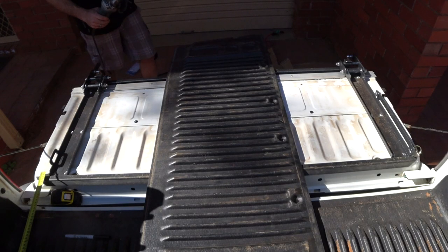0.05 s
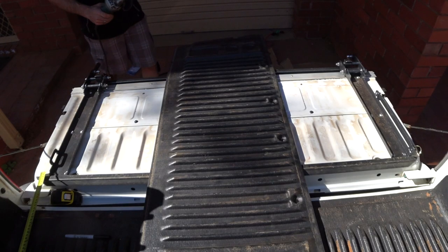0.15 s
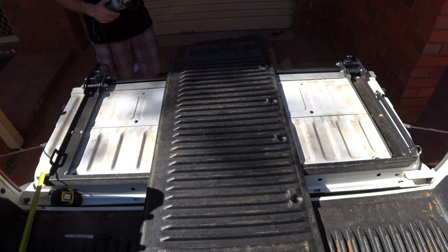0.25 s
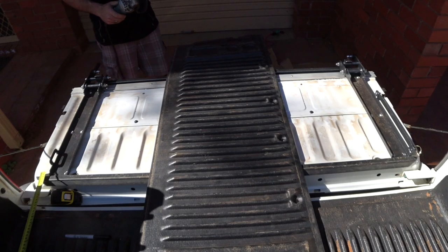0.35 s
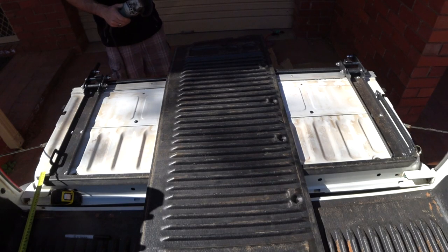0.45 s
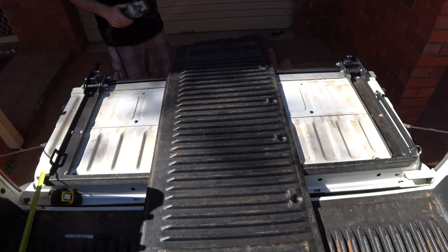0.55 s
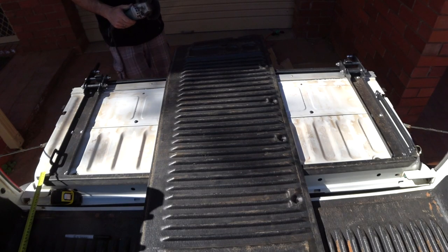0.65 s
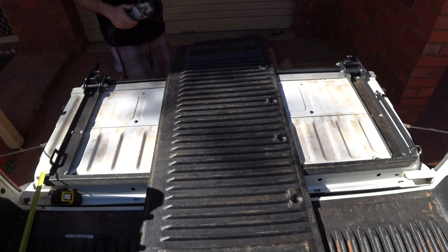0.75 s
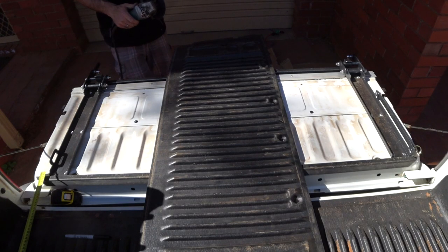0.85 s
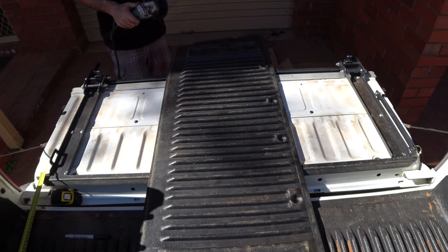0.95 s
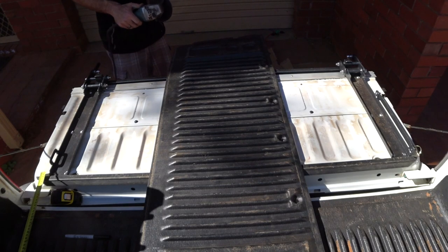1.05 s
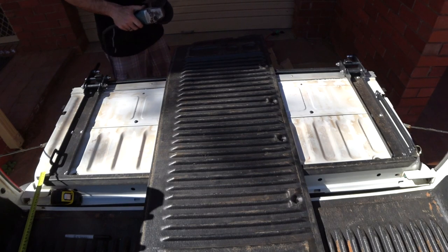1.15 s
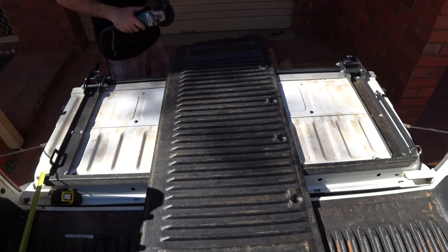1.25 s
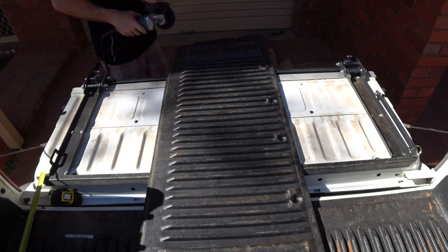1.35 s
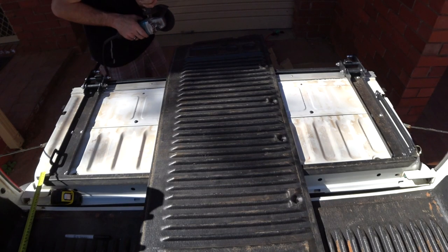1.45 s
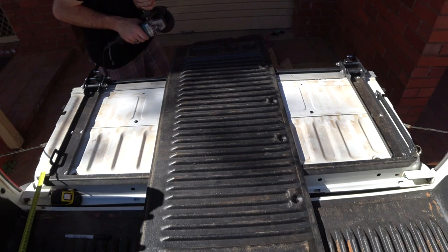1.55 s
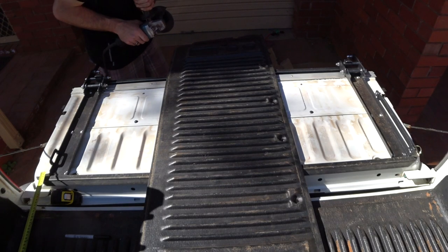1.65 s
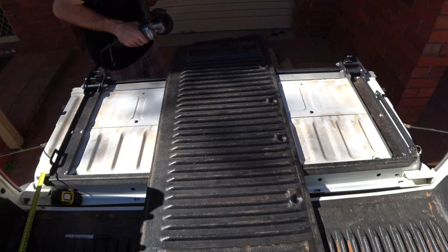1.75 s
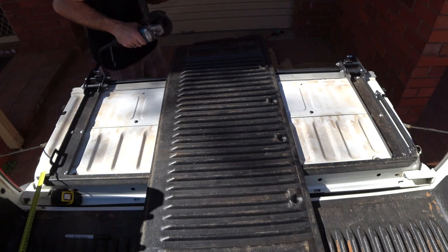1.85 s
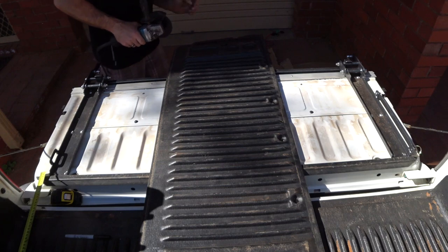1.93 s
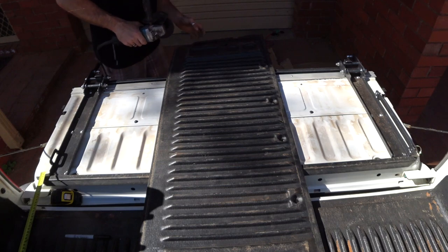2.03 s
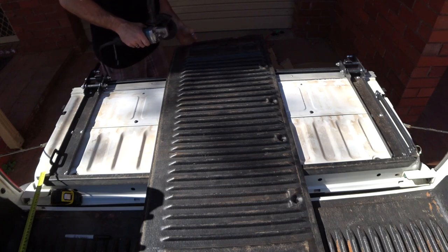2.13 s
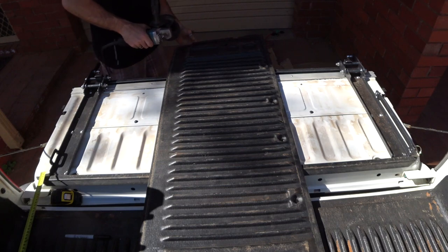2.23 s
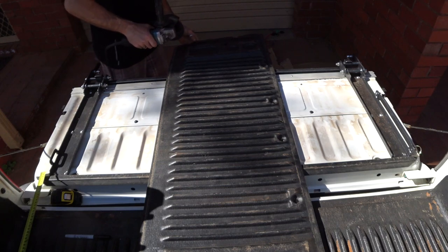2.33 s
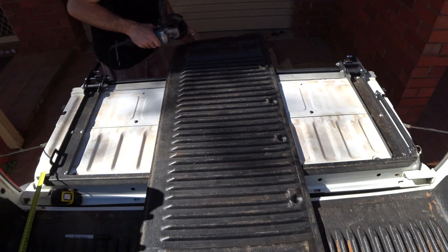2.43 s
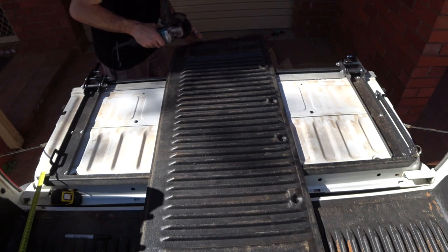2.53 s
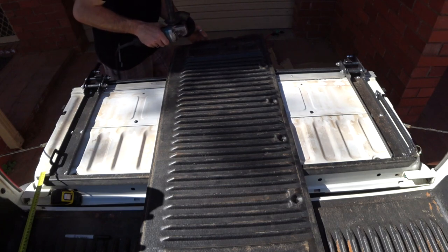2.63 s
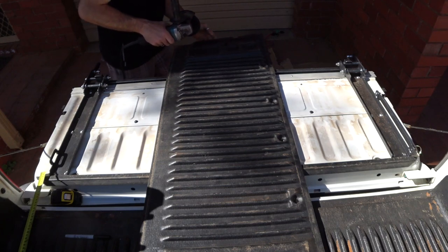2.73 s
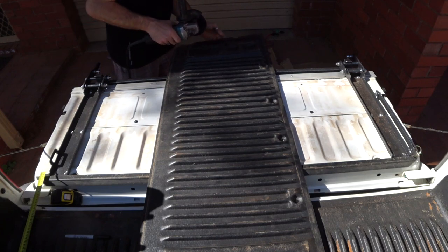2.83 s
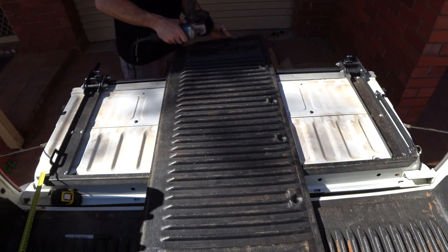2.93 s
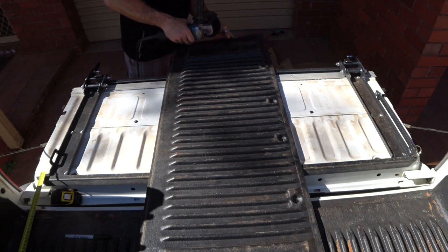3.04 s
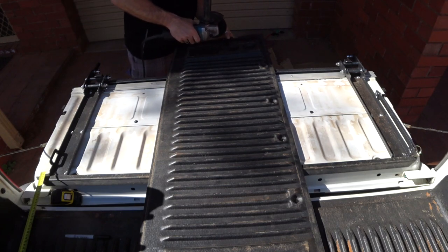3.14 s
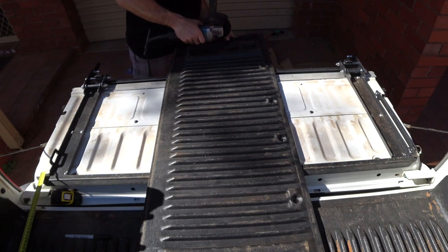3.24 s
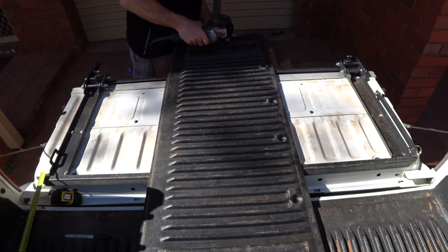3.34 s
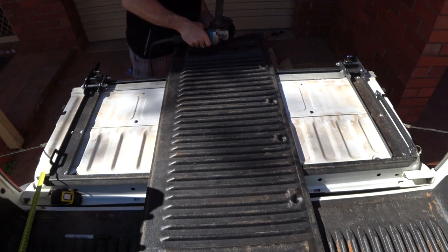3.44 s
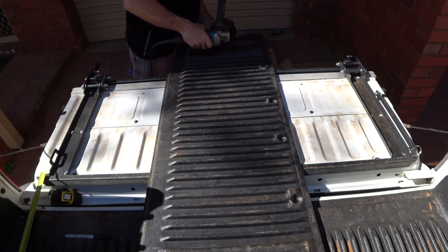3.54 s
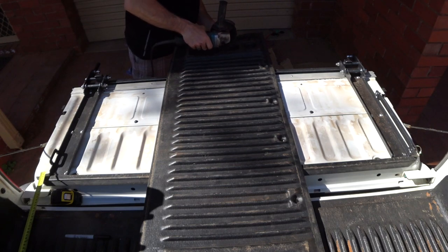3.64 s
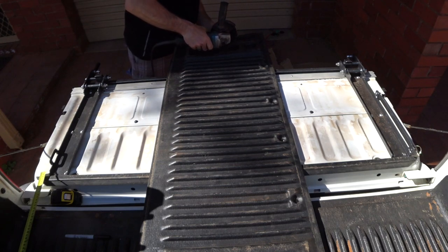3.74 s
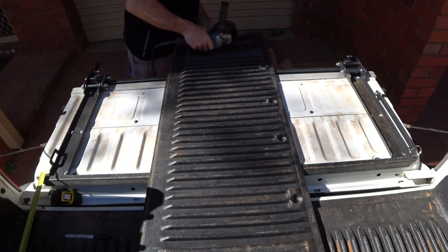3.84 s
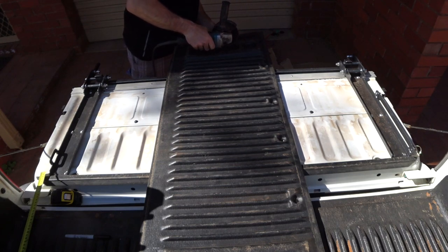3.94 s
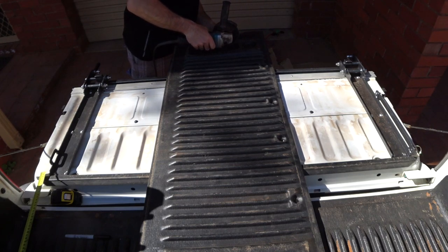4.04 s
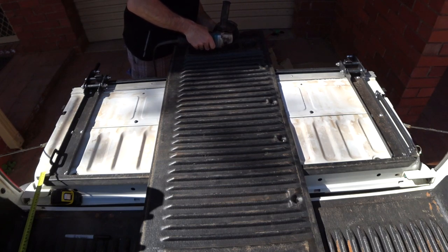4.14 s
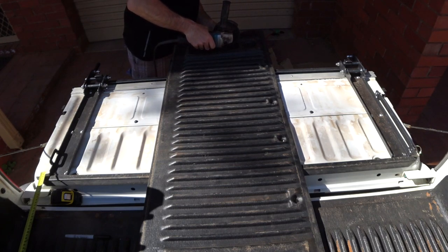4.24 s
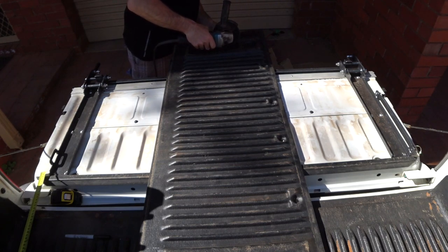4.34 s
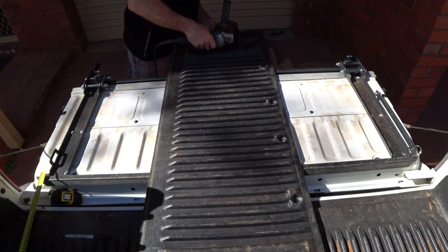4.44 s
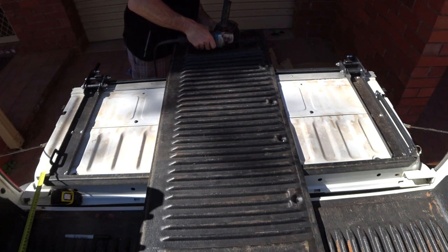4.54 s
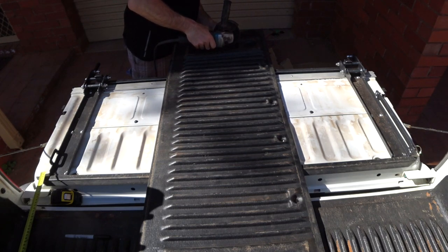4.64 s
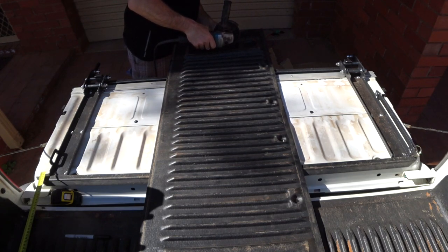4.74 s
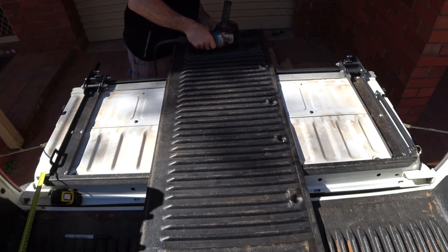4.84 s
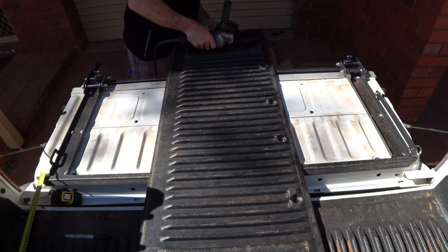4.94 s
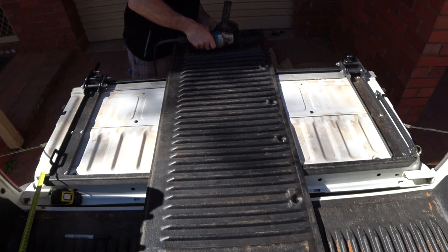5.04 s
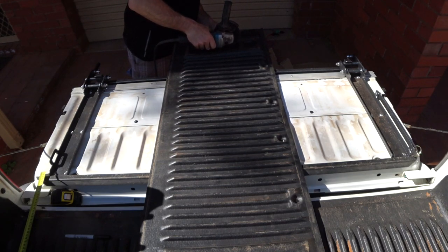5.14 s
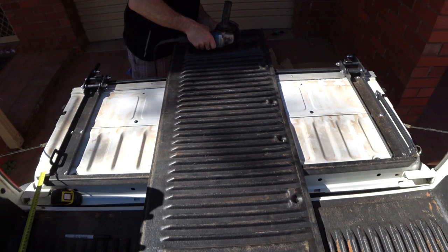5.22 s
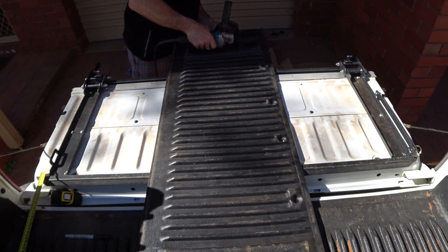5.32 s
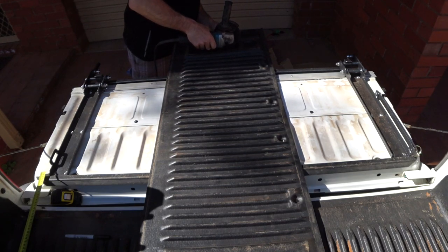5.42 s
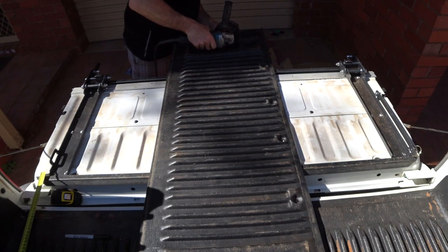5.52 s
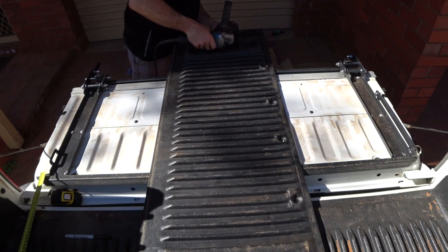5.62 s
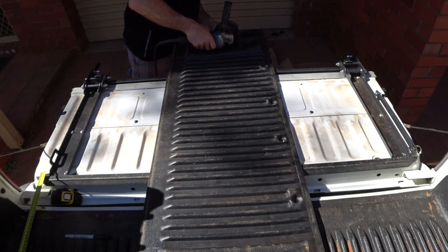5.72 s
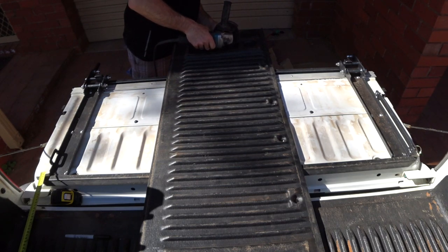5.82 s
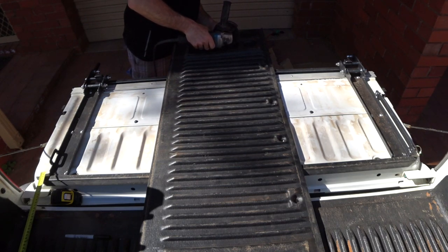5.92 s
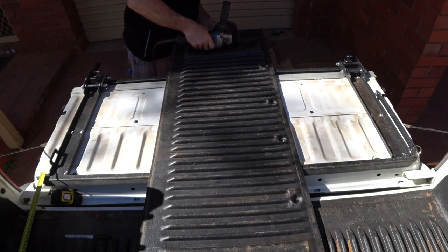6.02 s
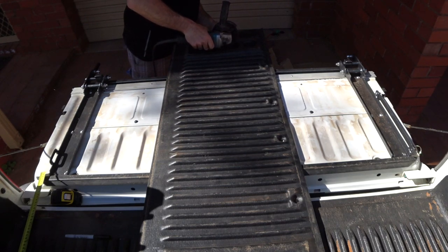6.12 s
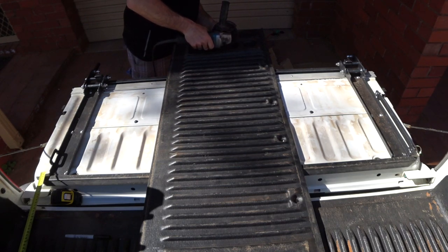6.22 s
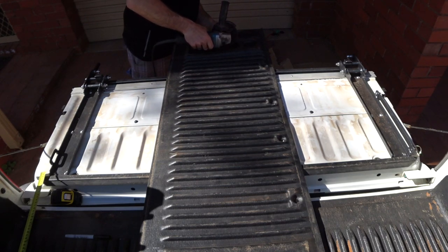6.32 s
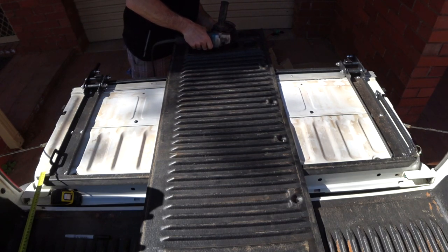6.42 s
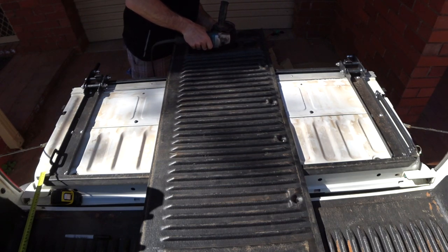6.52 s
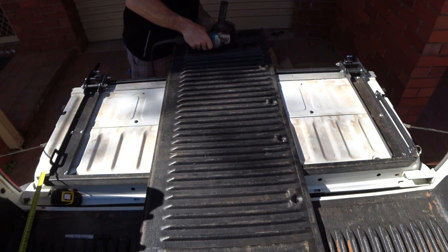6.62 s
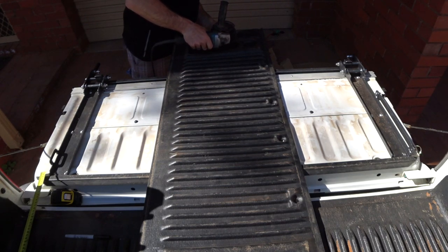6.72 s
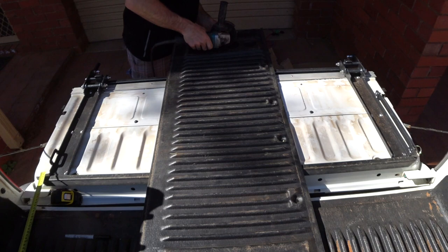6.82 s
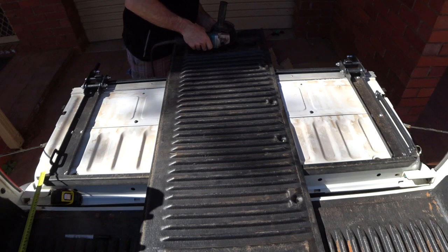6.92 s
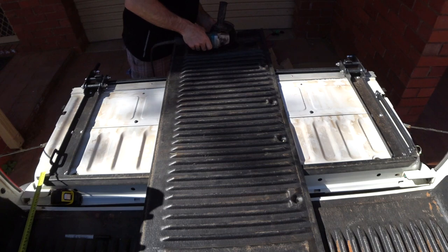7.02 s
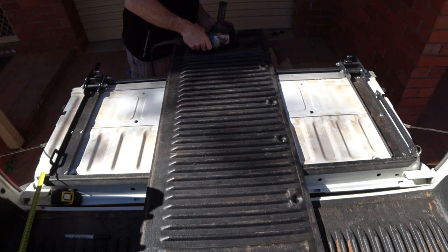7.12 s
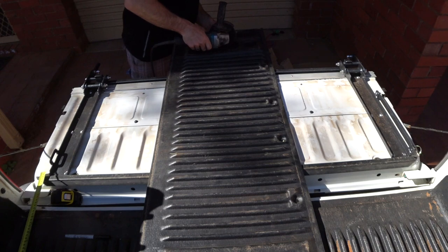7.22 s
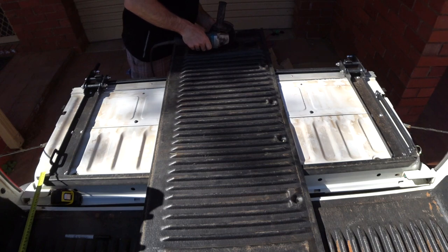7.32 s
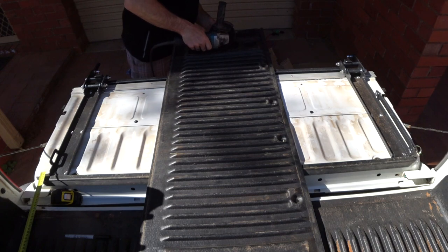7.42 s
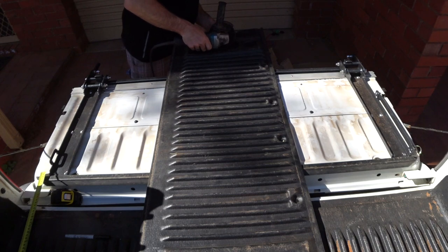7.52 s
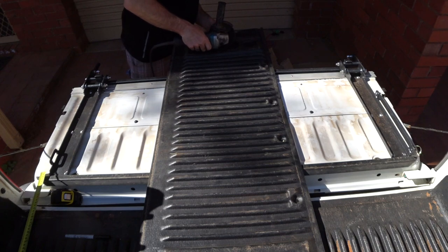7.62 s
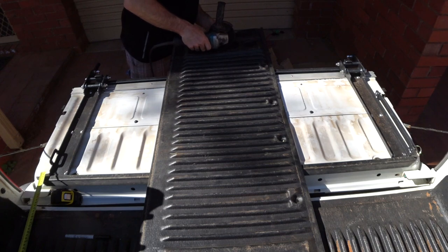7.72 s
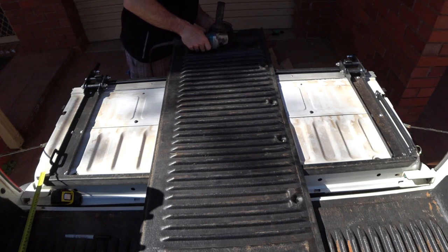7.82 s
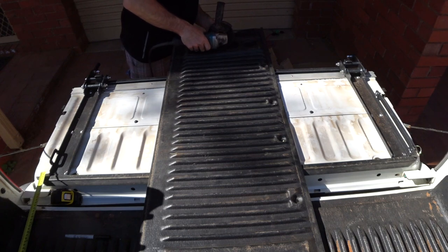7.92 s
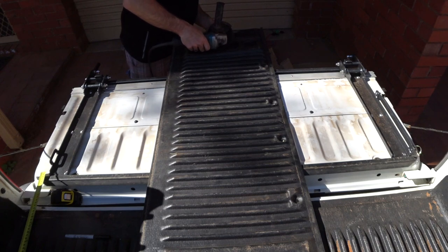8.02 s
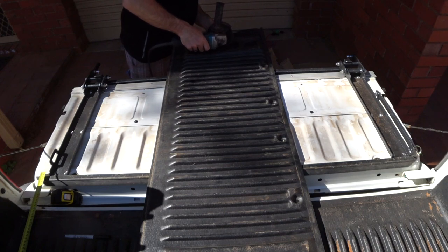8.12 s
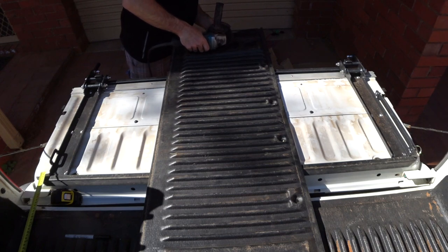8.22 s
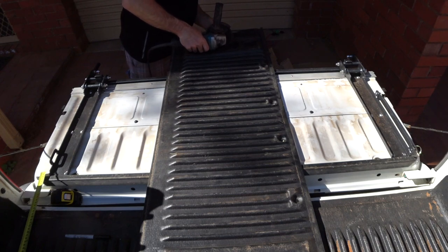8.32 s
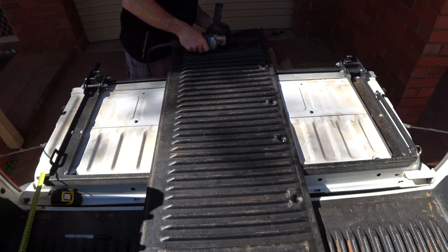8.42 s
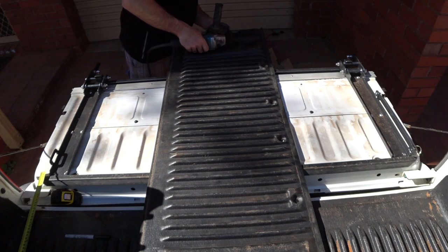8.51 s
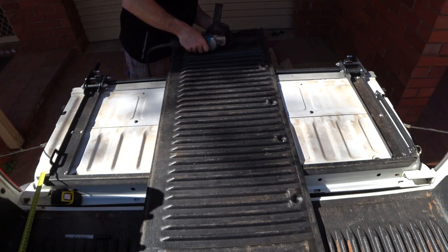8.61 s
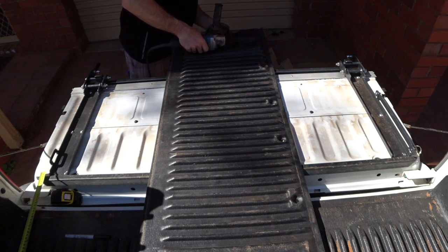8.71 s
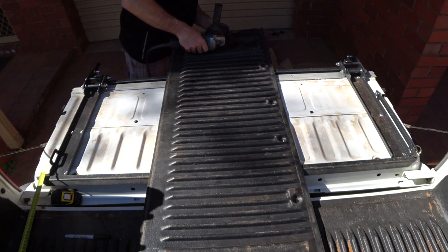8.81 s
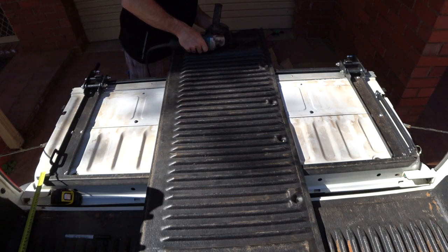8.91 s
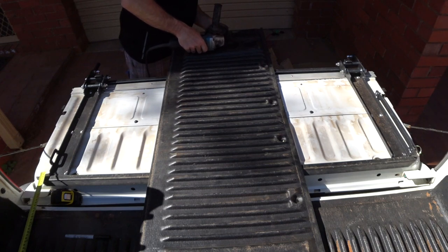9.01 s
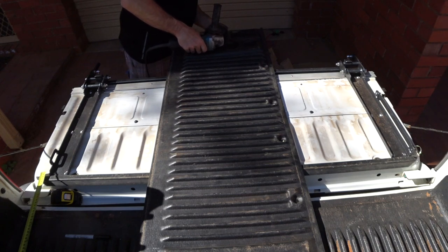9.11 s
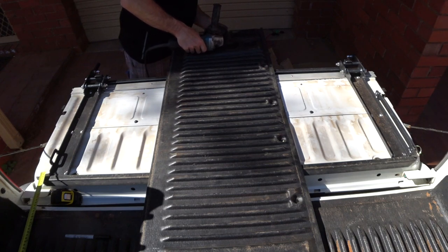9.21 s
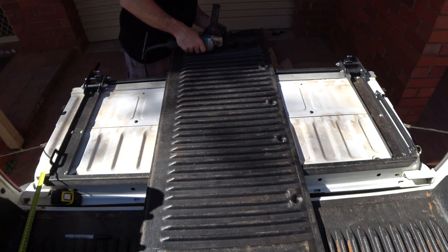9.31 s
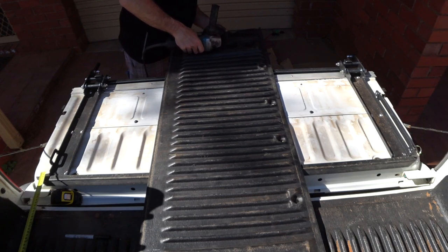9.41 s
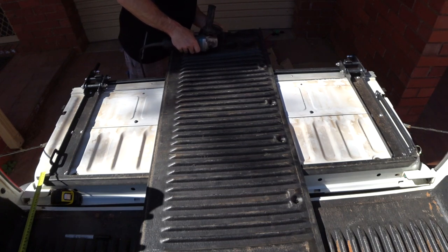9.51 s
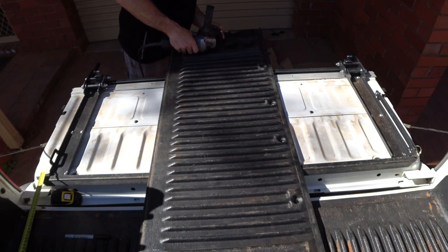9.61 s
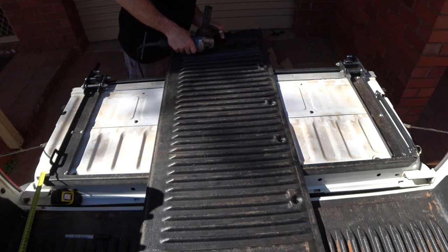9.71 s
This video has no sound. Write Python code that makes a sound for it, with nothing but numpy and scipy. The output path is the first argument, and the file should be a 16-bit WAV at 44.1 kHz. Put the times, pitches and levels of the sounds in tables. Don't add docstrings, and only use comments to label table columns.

```python
import sys
import numpy as np
from scipy import signal
from scipy.fft import rfft, irfft, next_fast_len
from scipy.io import wavfile
from scipy.ndimage import uniform_filter1d, map_coordinates

SR = 44100
rng = np.random.default_rng(int(sys.argv[2]) if len(sys.argv) > 2 else 0)


def master(y):
    cut = np.clip(np.atleast_2d(y).T, -1, 1)
    pcm = np.round(cut * 32767)
    wavfile.write(sys.argv[1], SR, pcm.astype(np.int16))


def boost(x):
    u = np.asarray(x, float) / 20
    return 10 ** u


N = 430416
TIME = np.arange(N) / SR
SPLICE = 9.402
GEAR = 37 / 10


def unit(x):
    return x / np.sqrt(np.mean(abs(x) ** 2) + 1e-20)


def along(points, hz):
    f, v = np.transpose(points)
    return np.interp(np.log(hz + 1), np.log(f + 1), v)


def curves(rows, t=TIME):
    s, *cols = np.transpose(rows)
    return [np.interp(t, s, c) for c in cols]


def between(t0, t1, fade):
    return np.clip((TIME - t0) / fade, 0, 1) * np.clip((t1 - TIME) / fade, 0, 1)


def wobble(rate, t=TIME):
    knots = rng.standard_normal(int(N * 40 / SR))
    return map_coordinates(knots, [t * np.clip(rate, 0, 39)])


def filtered(x, response):
    m = next_fast_len(N + SR // 2)
    return irfft(rfft(x, m) * response(np.fft.rfftfreq(m, 1 / SR)), m)[..., :N]


def humps(modes, hz):
    return np.sqrt(sum(boost(2 * db) / (1 + (2 * (hz - c) / w) ** 2) ** 2 for c, w, db in modes))


def rush(gain, patchy_db, beat=1, size=12):
    z = signal.stft(rng.standard_normal(N) * beat, nperseg=512)[2]
    across = uniform_filter1d(rng.standard_normal(z.shape), 6, 0)
    patches = unit(uniform_filter1d(across, size, 1))
    noise = signal.istft(z * boost(patchy_db * patches), nperseg=512)[1][:N]
    return unit(filtered(noise, gain))


def fuzzy(turns, rough, rate):
    knots = rng.standard_normal((2, N // 16))
    across, ahead = (map_coordinates(k, [TIME * rate]) for k in knots)
    scatter = unit(across + 1j * ahead)
    rough = np.clip(rough, 0, 1)
    mixed = np.sqrt(1 - rough) + np.sqrt(rough) * scatter
    return np.sqrt(2) * (mixed * np.exp(2j * np.pi * turns)).real


# (frequency [Hz], level [dB per Hz])
STREET_SPECTRUM = [(41, -54), (70, -24), (102, -27), (210, -15), (389, -9), (501, -10.5), (733, -4.5),
                   (850, -2), (965, -0.5), (1190, -1.5), (5590, -29.5), (11000, -28.5), (14300, -66),
                   (22000, -120)]
# (time [s], level [dB])
STREET_LEVEL = [(0.0, -42), (0.618, -41), (0.91, -41)]


def street():
    motor_off = 1 - 1.1 * between(.92, 8.8, 0.062)
    traffic = rush(lambda f: boost(along(STREET_SPECTRUM, f)), patchy_db=1)
    return motor_off * boost(curves(STREET_LEVEL)[0] + wobble(1.5)) * traffic


# (time [s], pitch [Hz], level [dB])
BIRD_CALL = [
    (0.475, 2260, -58),
    (0.502, 2780, -55),
    (0.568, 3480, -52),
    (0.603, 4440, -52),
    (0.62, 4400, -61),
]


def bird():
    hz, db = curves(BIRD_CALL)
    call = boost(db + 6) * np.sin(2 * np.pi * np.cumsum(hz) / SR) * between(.475, 0.606, 0.01)
    t = np.arange(SR // 2) / SR
    echo = unit(rng.standard_normal(len(t)) * boost(-60 * t / .5)) / np.sqrt(len(t))
    return call + boost(3) * signal.fftconvolve(call, echo)[:N]


# (time [s], level [dB])
HAND_SLIDE = [
    (0.15, -68),
    (0.192, -48),
    (0.228, -49),
    (0.256, -43),
    (0.271, -30),
    (0.29, -38),
    (0.342, -56),
    (0.45, -54),
]
# (time [s], peak level [dB], ring [Hz], decay to -60 dB [s])
HAND_CLICKS = [
    (0.1925, -41, 7060, 0.033),
    (0.2394, -23, 3610, 0.08),
    (0.24, -28, 4950, 0.05),
    (0.2405, -30, 1250, 0.04),
    (0.2735, -23, 5700, 0.03),
    (0.3995, -37, 3430, 0.03),
    (0.918, -14, 7340, 0.02),
    (0.928, -27, 4870, 0.032),
]


def hand():
    rub = rush(lambda f: humps([(6300, 7000, 0)], f), patchy_db=1.2)
    out = boost(curves(HAND_SLIDE)[0] + 2 * wobble(38)) * rub * between(.15, .45, .02)
    t = np.arange(SR // 10) / SR
    for s, db, hz, t60 in HAND_CLICKS:
        click = 0.6 * np.sin(2 * np.pi * hz * t) + 0.3 * rng.standard_normal(len(t))
        out[round(s * SR):][:len(t)] += boost(db - 60 * t / t60) * click
    return out


def rim_tones(rows, gain, wear, wear_hz, count, sings, slack_db):
    t = TIME[round(rows[0][0] * SR) - 1000:round(rows[-1][0] * SR) + 1000]
    knots = t[::128]
    turn = np.exp(2j * np.pi * np.cumsum(curves(rows, t)[0]) / SR)
    knot_hz = curves(rows, knots)[0]
    wave, part = np.ones_like(turn), np.zeros(len(t))
    for k in range(1, count):
        wave = wave * turn
        share = np.clip((wear * k) ** 2, 0, .9)
        change = wobble(wear_hz, knots) + 1j * wobble(wear_hz, knots)
        drift = np.sqrt(1 - share) + np.sqrt(share / 2) * change
        songs = [boost(db) * np.exp(-(2 * (knots - s) / length) ** 4)
                 for s, length, db, lobe in sings if round(lobe) == k]
        slack = boost(slack_db * (.5 + .5 * bool(songs)))
        size = gain(k * knot_hz) * drift * slack
        size = size + sum(songs) * boost(2.1 * wobble(wear_hz, knots))
        size = size * np.exp(2j * np.pi * rng.random())
        part += (np.interp(t, knots, size) * wave).real
    out = np.zeros(N)
    out[round(t[0] * SR):][:len(t)] = part * np.sqrt(2)
    return out


# (time [s], disc turns [Hz], level [dB])
FAST_DISC = [(9.41, 505.6, 0.5), (9.456, 511, 2), (9.484, 498, 1.5), (9.51, 508, 2.5), (9.528, 494.6, 0.5),
             (9.592, 490, 1.5), (9.646, 474.6, -0.5), (9.746, 469.8, 1.5), (9.76, 474, 2)]
# (frequency [Hz], width [Hz], level [dB])
FAST_PEAKS = [(1430, 99, -49), (1840, 210, -37.5), (2450, 150, -55), (6560, 2400, -32), (12500, 7400, -34),
              (1212, 56, -36), (1452, 44, -44), (1700, 66, -36), (2196, 23, -36), (2676, 85, -54),
               (3004, 87, -54), (3276, 97, -31), (4036, 112, -34), (4652, 125, -31), (4924, 94, -31),
               (5356, 139, -23), (5716, 146, -25), (5956, 102, -29), (6220, 144, -26), (6692, 165, -31),
               (7404, 180, -28), (8260, 167, -32), (8628, 120, -37), (9036, 165, -32), (9332, 107, -34),
               (9636, 224, -29), (10420, 160, -29), (11052, 213, -36), (11868, 269, -35), (12252, 133, -39),
               (12636, 130, -40), (13444, 136, -39), (14380, 240, -38), (14860, 272, -35),
               (15580, 155, -38)]
# (frequency [Hz], level [dB per Hz])
FAST_AIR = [(60, -38), (1100, -31), (1500, -20), (2150, -32), (2700, -19), (3600, -10), (5500, 0),
            (8600, -10), (14300, -6), (15700, -21)]
# (middle [s], length [s], level [dB], strikes a turn)
FAST_SINGS = [(9.426, 0.032, -28, 11), (9.428, 0.036, -30, 29), (9.432, 0.036, -36.3, 25),
              (9.44, 0.06, -33.5, 17), (9.442, 0.064, -29, 19), (9.444, 0.025, -36, 9),
              (9.488, 0.076, -38, 13), (9.49, 0.035, -33, 18), (9.5, 0.036, -35, 19),
              (9.502, 0.032, -36, 14), (9.534, 0.032, -31, 12), (9.536, 0.028, -33, 30),
              (9.536, 0.028, -33, 8), (9.54, 0.036, -36.3, 26), (9.544, 0.044, -34, 29),
              (9.546, 0.048, -40, 11), (9.55, 0.04, -34.7, 21), (9.55, 0.044, -28, 15),
              (9.576, 0.036, -30, 20), (9.576, 0.036, -33, 30), (9.59, 0.056, -37, 16),
              (9.592, 0.036, -37, 7), (9.604, 0.116, -36, 14), (9.618, 0.043, -32.9, 17),
              (9.618, 0.056, -38.6, 24), (9.618, 0.064, -28, 11), (9.62, 0.044, -35, 15),
              (9.622, 0.033, -35, 20), (9.632, 0.028, -34, 31), (9.634, 0.032, -36, 23),
              (9.638, 0.048, -36, 8), (9.648, 0.055, -27.7, 13), (9.676, 0.092, -29, 12),
              (9.68, 0.06, -33.0, 25), (9.684, 0.084, -37, 19), (9.688, 0.15, -36, 7),
              (9.69, 0.088, -33, 22), (9.698, 0.048, -38, 14), (9.7, 0.052, -40, 16),
              (9.706, 0.11, -32, 11), (9.71, 0.081, -32.3, 21), (9.714, 0.056, -37, 13),
              (9.722, 0.064, -34, 10), (9.722, 0.065, -33, 17), (9.738, 0.032, -36.0, 26)]
# (middle [s], length [s], level [dB], strikes a turn)
MORE_SINGS = [(5.7, 0.13, -33, 20), (6.11, 0.15, -28.5, 12), (6.3, 0.13, -28, 11), (6.948, 0.23, -27.5, 37),
              (7.098, 0.86, -28.5, 36), (9.3, 0.31, -51.5, 3), (5.7, 0.27, -36, 15), (7.6, 0.38, -38, 17),
              (8.65, 0.22, -37, 16), (7.7, 0.33, -33, 14), (4.5, .4, -35, 18), (9.33, .15, -33, 13),
              (8.66, 0.085, -29, 23), (8.15, 0.32, -38, 18), (8.05, 0.22, -35, 23), (7.8, 0.28, -42, 12),
              (9.3, 0.19, -35, 11), (8.6, 0.19, -35, 10), (9.47, 0.04, -46, 5), (9.465, 0.03, -33, 8),
              (5.74, 0.12, -30, 33), (6.08, 0.25, -32, 33), (6.2, 0.45, -35, 29), (8.95, 0.08, -33, 11),
              (9.42, 0.041, -31, 10)]


def fast_cut():
    hz, db = curves(FAST_DISC)

    def gain(f):
        bass_cut = 1 / (1 + (1250 / f) ** 12)
        return bass_cut * humps(FAST_PEAKS, f)

    sings = FAST_SINGS + [c for c in MORE_SINGS if c[0] > SPLICE]
    rim = rim_tones(FAST_DISC, gain, wear=.08, wear_hz=25, count=34, sings=sings, slack_db=-4)
    motor = fuzzy(GEAR * np.cumsum(hz) / SR, rough=0.35, rate=40)
    air = rush(lambda f: boost(along(FAST_AIR, f)), patchy_db=0.5)
    return boost(db) * (boost(-.4) * rim + boost(-47) * motor + boost(-30) * air)


# (gap [Hz], time constant [s])
RUN_UP = [(54, .075), (72, .43)]
# (time [s], disc turns [Hz])
CUT = [(5.2, 162.6), (5.46, 161.9), (6.03, 155.9), (6.26, 153), (6.66, 148.4), (6.87, 144.7), (7.16, 142),
       (7.33, 141.3), (7.64, 137.5), (7.93, 135.7), (8.02, 134.3), (8.48, 131.5), (8.7, 128.1),
       (8.82, 128.1), (9.04, 126.5), (9.17, 125), (9.26, 125), (9.4, 125.8)]
FREE_HZ = 162.6


def disc_speed(run):
    cut_hz, = curves(CUT)
    free_hz = FREE_HZ - sum(gap_hz * np.exp(-run / lag) for gap_hz, lag in RUN_UP)
    return np.where(TIME < CUT[0][0], free_hz, cut_hz)


# (frequency [Hz], level [dB], decay to -60 dB [s])
KICK = [(1620, -21, 0.45), (2570, -28, 0.4), (3210, -19, 0.044), (5300, -36, .15), (6700, -23, .04)]


def start_jolt(run):
    jolt = sum(boost(db - 60 * run / t60) * fuzzy(hz * run, rough=.95, rate=450) for hz, db, t60 in KICK)
    guard = boost(-27 + 1.8 * wobble(20)) * fuzzy(4950 * run, rough=0.91, rate=300)
    return jolt + guard * between(.93, 1.345, .015)


def idle_hum(turns):
    disc = boost(-46.5 + 1.97 * wobble(2.3)) * np.sin(2 * np.pi * 3 * turns)
    rotor = boost(-45.5 + 2.1 * wobble(3.97)) * np.sin(2 * np.pi * GEAR * turns)
    rotor_on = .5 * between(0.99, 1.4, .05) + between(2.3, 3.75, 0.12)
    return disc * between(1.36, 1.74, .1) + rotor * rotor_on


def fan_hiss(fan_db, slowed, loaded):
    fan_hz = 7210 - 14 * np.minimum(slowed, 30) + 100 * wobble(2.5)
    hiss = fuzzy(np.cumsum(fan_hz) / SR, rough=0.89, rate=2600)
    return boost(fan_db - 8 + 1.4 * loaded * wobble(5)) * hiss


# (start [s], end [s], from [Hz], to [Hz], level [dB])
GLINTS = [(1.3, 1.75, 5300, 5500, -27), (1.8, 2.1, 8300, 6800, -33), (1.95, 2.3, 7500, 7800, -32),
          (2.3, 2.95, 6900, 6200, -28), (2.6, 3.4, 7800, 7500, -31.5), (2.95, 3.9, 6700, 6800, -27.5),
          (1.8, 2.6, 4300, 4400, -41), (2.4, 2.7, 4000, 4500, -31), (3.25, 3.95, 4600, 4850, -30),
          (3.85, 5.15, 5170, 5120, -25.5), (3.5, 5.3, 6300, 6800, -31), (3.4, 5.2, 5900, 5850, -32),
          (3.8, 5.3, 2900, 2950, -32.5), (3.3, 5.3, 3500, 3500, -35), (0.89, 1.345, 5030, 4960, -23),
          (0.9, 1.01, 2300, 2700, -26)]


def glints():
    out = np.zeros(N)
    for t0, t1, hz0, hz1, db in GLINTS:
        hz = np.interp(TIME, [t0, t1], [hz0, hz1])
        band = fuzzy(np.cumsum(hz) / SR, rough=.999, rate=420)
        out += boost(db + 1.7 * wobble(6)) * between(t0, t1, 0.21 * min(t1 - t0, .6)) * band
    return out


# (frequency [Hz], level [dB per Hz])
RAISED_AIR = [(35, -71), (60, -41), (253, -43), (308, -22), (409, -26), (592, -15), (821, -27), (1300, -7),
              (1610, -4), (1800, -3), (4030, -0.5), (5500, 1), (7110, -5.5), (8000, -7.5), (8900, -6.5),
              (11000, -3), (14300, -47), (22000, -120)]
LOWERED_AIR = [(35, -74), (60, -22), (199, -51), (322, -24), (375, -29.5), (579, -14.5), (1070, -6.5),
               (1220, -19.5), (1550, -9.5), (2970, -6), (4350, -5), (5130, -1), (5500, -3), (7700, -4.5),
               (8300, -9.5), (11000, -10), (14300, -40), (22000, -120)]
# (frequency [Hz], width [Hz], level [dB])
GUARD = [(5130, 400, 0)]
HOUSING = [(1210, 130, 0), (1370, 280, -1)]
CASING = [(1650, 38, -0.5), (1787, 54, 5), (2360, 12, -19), (3057, 52, 6), (3475, 39, 7), (4690, 110, 2)]


def air_roar(run, turns, slowed, loaded, facing):
    level_db = -18.5 - 0.14 * slowed * loaded - 4 * np.exp(-run / 0.18) + 0.35 * wobble(2.5)
    torque = np.where(TIME < CUT[0][0], 0.67 * np.exp(-run / 0.68), np.tanh(slowed / 13))
    guard_db = -24 + 15.5 * torque + 3.5 * facing + wobble(2.53)
    housing_db = -16 + 5.5 * facing + 0.53 * wobble(2.39)
    disc_db = 0.31 * np.cos(2 * np.pi * turns)
    rotor_db = 2 * np.cos(2 * np.pi * GEAR * turns)
    beat = boost(disc_db + rotor_db + 0.72 * wobble(35))
    air = np.sqrt(1 - facing) * rush(lambda f: boost(along(RAISED_AIR, f)), 1.5, beat, size=40)
    air += np.sqrt(facing) * rush(lambda f: boost(along(LOWERED_AIR, f)), 1, beat, size=24)
    air += boost(guard_db) * rush(lambda f: humps(GUARD, f), 1.5, beat)
    air += boost(housing_db) * rush(lambda f: humps(HOUSING, f), 1, beat)
    air += boost(-12.0) * rush(lambda f: humps(CASING, f), 1.5, beat, size=30)
    return boost(level_db) * air


# (multiple of motor turns, level [dB])
ARMATURE = [(2, -16), (4, -5.5), (6, -1.5), (18, -18)]
# (frequency [Hz], width [Hz], level [dB])
SLOT_CASING = [(4300, 1330, -18), (5250, 320, -33), (6960, 880, -30.5), (6000, 6100, -50)]


def motor_whine(turns, disc_hz, loaded):
    casing = humps(SLOT_CASING, 12 * GEAR * disc_hz) * boost(-2 * loaded)
    hunting = .6 - .5 * between(1.25, 11, .3)
    whine = sum(boost(db + 2.35 * wobble(6)) * fuzzy(k * GEAR * turns, rough=0.44, rate=60)
                for k, db in ARMATURE) * between(1.44, 9.9, 1.34)
    whine += boost(1.7 * wobble(6)) * fuzzy(12 * GEAR * turns, rough=hunting, rate=380)
    whine += boost(-5) * fuzzy(25 * GEAR * turns, rough=.99, rate=900) * between(1.05, 1.13, .02)
    return casing * whine


# (frequency [Hz], width [Hz], level [dB])
MESH_GUARD = [(6060, 150, -35), (5560, 250, -32), (5250, 220, -27), (4794, 203, -30)]
# (frequency [Hz], width [Hz], level [dB])
WARP_PANEL = [(311, 22, -42.5), (290, 19, -48), (262, 30, -66)]
# (frequency [Hz], width [Hz], level [dB])
ROTOR_PANEL = [(537, 49, -46.5), (496, 20, -50), (468, 30, -44)]


def shaft_tones(turns, disc_hz):
    mesh = humps(MESH_GUARD, 10 * GEAR * disc_hz) * fuzzy(10 * GEAR * turns, rough=0.5, rate=25)
    warp = humps(WARP_PANEL, 2 * disc_hz) * fuzzy(2 * turns, rough=0.15, rate=5.8)
    rotor = humps(ROTOR_PANEL, GEAR * disc_hz) * fuzzy(GEAR * turns, rough=0.08, rate=7.4)
    return mesh + warp * between(4.95, 10, .5) + rotor


# (frequency [Hz], width [Hz], level [dB])
PANEL_AND_GUARD = [(352, 19, -49), (415, 20, -53), (466, 15, -42), (499, 21, -40), (574, 23, -35), (655, 25, -47),
                   (715, 11, -51), (766, 21, -45), (826, 28, -39), (910, 20, -32), (961, 11, -35), (1003, 32, -31),
                   (1078, 15, -42), (1126, 10, -38), (1177, 35, -30), (1264, 11, -34), (1351, 25, -31),
                   (1420, 25, -35), (1558, 35, -33), (1672, 38, -28), (1726, 17, -33), (1858, 49, -32),
                   (1969, 22, -36), (2068, 53, -34), (2128, 53, -34), (2251, 23, -35), (2446, 60, -34),
                   (2524, 28, -39), (2593, 38, -40),
                   (2735, 60, -40), (2910, 21, -37), (2960, 63, -35), (3075, 59, -35), (3190, 39, -35),
          (3465, 62, -35), (3795, 55, -35), (3870, 75, -35), (4225, 53, -38), (4420, 66, -35),
          (4635, 63, -35), (4810, 45, -32), (5185, 115, -29), (5505, 63, -34), (5710, 63, -36),
          (6085, 78, -34), (6345, 40, -35), (6545, 52, -38), (7220, 106, -37), (7815, 56, -40),
          (8035, 71, -42), (8535, 105, -44), (10390, 219, -43), (10915, 81, -45)]
# (frequency [Hz], level [dB])
RIM_FLOOR = [(120, -79), (170, -63), (255, -71), (340, -60), (800, -45.5), (1300, -34.5), (3000, -37.5),
             (5500, -32), (7000, -36), (9000, -42), (11000, -39.5)]


def panel_gain(hz):
    return np.hypot(humps(PANEL_AND_GUARD, hz), boost(along(RIM_FLOOR, hz)))


# (middle [s], length [s], level [dB], strikes a turn)
SINGS = [(5.47, 0.22, -34, 11), (5.52, 0.2, -31, 19), (5.54, 0.45, -38.1, 5), (5.56, 0.37, -32, 23),
         (5.57, 0.14, -35, 32), (5.62, 0.16, -30.3, 31), (5.85, 0.17, -33, 8), (5.91, 0.59, -31.9, 24),
         (5.95, 0.21, -32, 22), (5.99, 0.4, -47, 3), (6.25, 0.2, -34, 35), (6.22, 0.26, -45, 5),
         (6.36, 0.45, -34, 6), (6.39, 0.29, -34, 8), (6.44, 0.26, -50, 4), (6.46, 0.2, -29, 34),
         (6.48, 0.34, -34, 9), (6.67, 0.22, -30, 8), (6.91, 0.74, -40.5, 4), (6.99, 0.36, -40, 7),
         (7.24, 0.44, -38.5, 11), (7.32, 0.16, -45, 4), (7.4, 0.57, -27, 37), (7.42, 0.34, -37, 7),
         (7.65, 0.76, -46, 6), (7.67, 0.14, -38, 9), (7.77, 0.32, -35.5, 7), (7.81, 0.47, -31.0, 35),
         (7.88, 0.15, -32.5, 15), (7.95, 0.14, -29, 42), (8.11, 0.12, -28, 46), (8.11, 0.26, -46, 7),
         (8.25, 0.65, -29.8, 54), (8.42, 0.17, -31.5, 14), (8.73, 0.38, -33, 43), (8.75, 0.18, -30.5, 13),
         (8.75, 0.38, -37, 14), (8.83, 0.2, -36, 19), (8.84, 0.36, -36, 42), (8.9, 0.2, -29.2, 40),
         (9.05, 0.8, -46, 4), (9.2, 0.22, -33, 17), (9.2, 0.4, -43, 8), (9.21, 0.3, -47, 58),
         (9.22, 0.41, -35, 18), (9.25, 0.26, -35, 44)]


def disc_in_plastic(slowed):
    sings = SINGS + [c for c in MORE_SINGS if c[0] < SPLICE]
    rim = rim_tones(CUT, panel_gain, wear=.045, wear_hz=7, count=90, sings=sings, slack_db=-5.5)
    return boost(0.026 * slowed) * rim


# (time [s], facing the panel [0-1], vents toward the microphones [dB])
HOLD = [(.93, 0.63, -36), (1.3, 0.4, -14.5), (1.8, 0.33, -13), (2.6, 0.26, -14.5), (3.1, 0.42, -17),
        (3.6, 0.7, -20), (4.5, 0.82, -25), (5.3, 0.65, -15.5), (5.6, 0.6, -34), (6.5, 0.85, -30),
        (7.7, 0.64, -37), (8.2, 0.54, -18.5), (9.4, 0.84, -26)]


def grinder():
    run = np.maximum(TIME - .926, 0)
    disc_hz = disc_speed(run)
    turns = np.cumsum(disc_hz) / SR
    slowed = FREE_HZ - disc_hz
    loaded = between(5.12, 10, .25)
    facing, fan_db = curves(HOLD)
    facing = np.clip(facing, 0, 1)
    tool = start_jolt(run) + idle_hum(turns) + fan_hiss(fan_db, slowed, loaded) + glints()
    tool += air_roar(run, turns, slowed, loaded, facing) + motor_whine(turns, disc_hz, loaded)
    tool += (disc_in_plastic(slowed) + shaft_tones(turns, disc_hz)) * loaded
    return tool * between(.9255, 10, 0.0022)


# (frequency [Hz], level [dB])
WALLS = [(60, -19), (110, -22), (200, -47), (380, -18), (700, -12.5), (1290, -11), (2380, -9), (4400, -12),
         (8120, -9), (15000, -12)]
# (frequency [Hz], left minus right [dB])
LEAN = [(300, 0), (1500, .9), (3000, .6), (5000, -.5), (9000, -.1), (12000, .3)]
# (time [s], left minus right [dB])
PAN = [
    (0.0, 2),
    (1.82, 0),
    (3.64, -1.0),
    (9.19, -1.0),
    (9.76, 0.0),
]


def carport(x):
    t = np.arange(SR // 3) / SR
    tails = rng.standard_normal((2, len(t))) * boost(-60 * t / 0.29) * (t > .004)
    tails = tails / np.linalg.norm(tails[0])
    sway = 1.86 * wobble(0.798)
    wet = signal.fftconvolve(x * np.array([np.cos(sway), np.sin(sway)]), tails, axes=1)
    side = filtered(wet.sum(0)[:N], lambda f: boost(along(WALLS, f) - 0.5))
    half = np.array([[.5], [-.5]])
    pair = filtered(np.array([x + side, x - side]), lambda f: boost(along(LEAN, f) * half))
    return pair * boost(curves(PAN)[0] * half)


def microphone(x):
    limited = x / (1 + abs(x / 0.6) ** 4) ** (1 / 4)
    heard = filtered(limited, lambda f: (f < SR / 4) * (f / 220) ** 2 / np.hypot(1, (f / 220) ** 2))
    murmur = rush(lambda f: f < 220, patchy_db=3.5)
    return heard + boost(-76.5 + 5.9 * between(.92, 10, .05)) * murmur


def scene():
    normal = microphone(carport(street() + bird() + hand() + grinder()))
    fast = carport(fast_cut() * between(9.38, 11, .01))
    fast = filtered(fast, lambda f: f < 15850)
    return normal * between(-1, SPLICE, 0.0055) + fast * between(SPLICE, 11, 0.0024)


def top_cut(x):
    return signal.sosfilt(signal.butter(12, 17070, fs=SR, output="sos"), x)


def record(dry):
    return top_cut(dry)


dry = scene()
out = record(dry)
master(out)
```